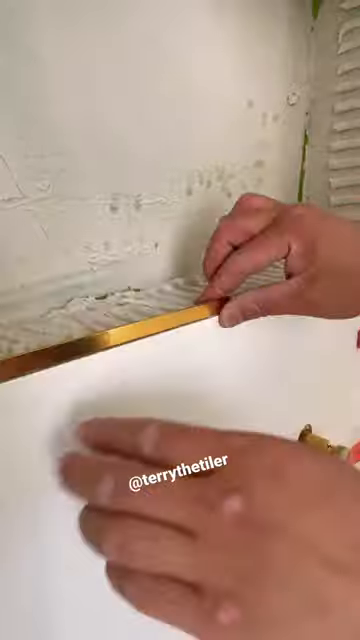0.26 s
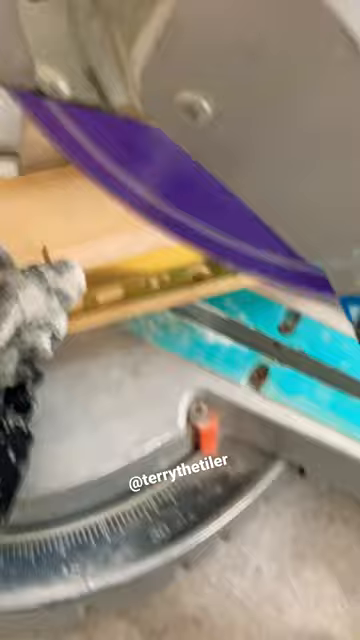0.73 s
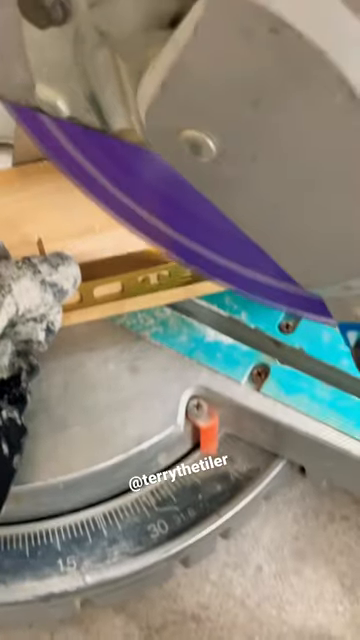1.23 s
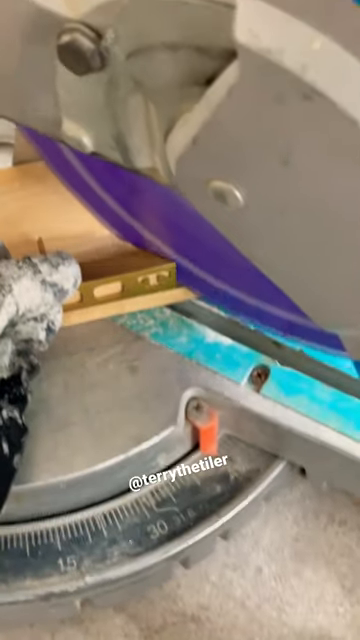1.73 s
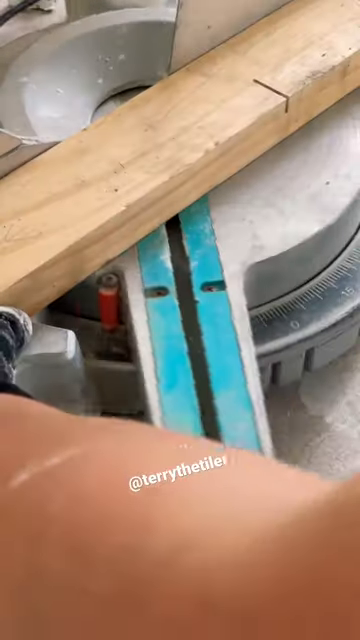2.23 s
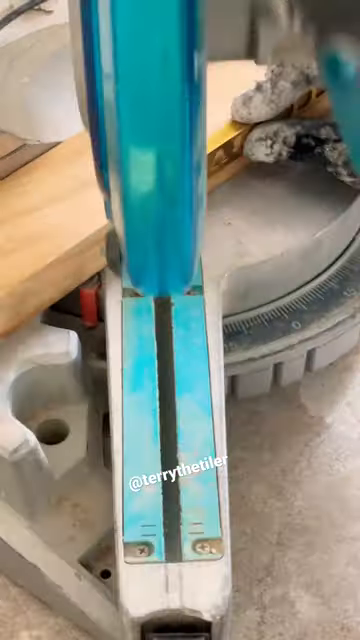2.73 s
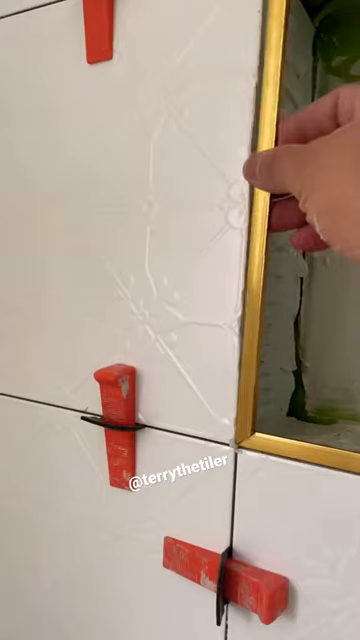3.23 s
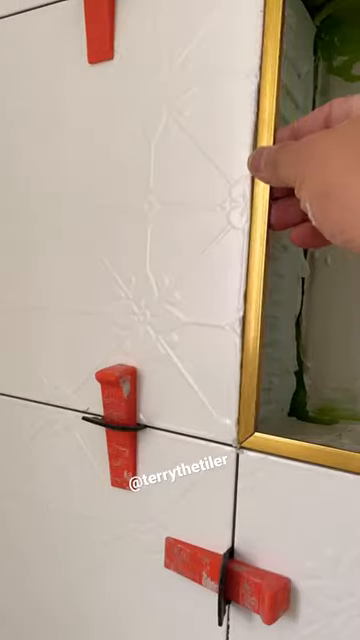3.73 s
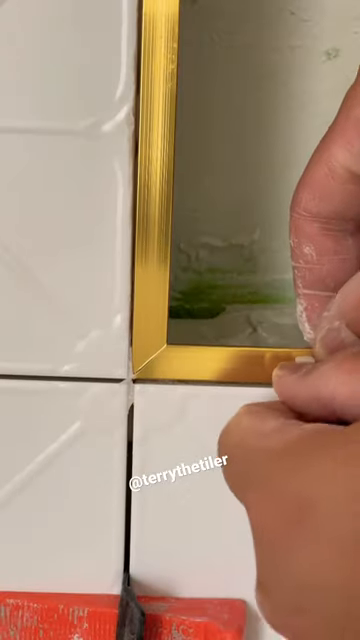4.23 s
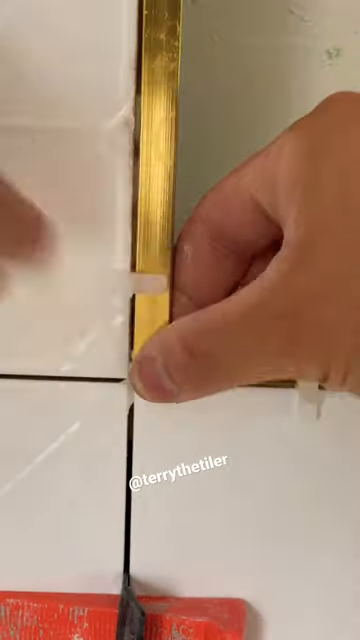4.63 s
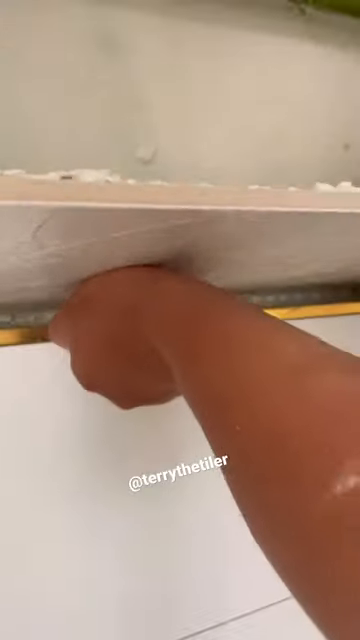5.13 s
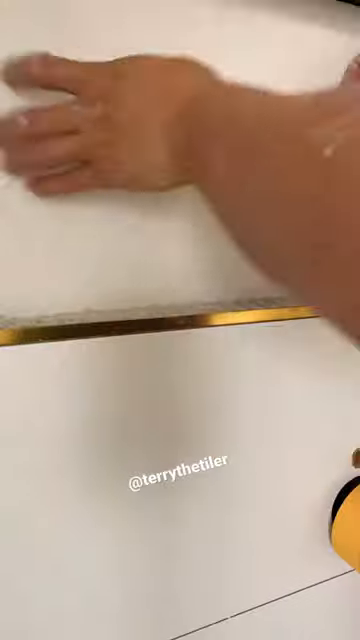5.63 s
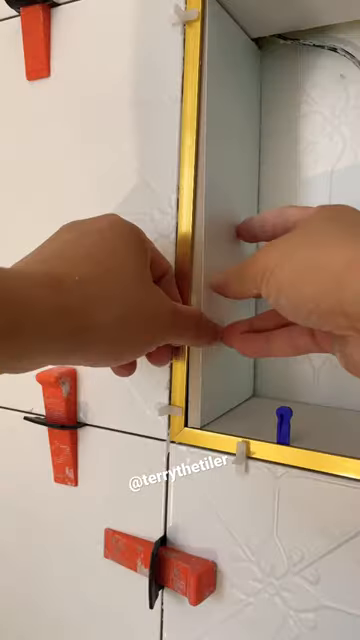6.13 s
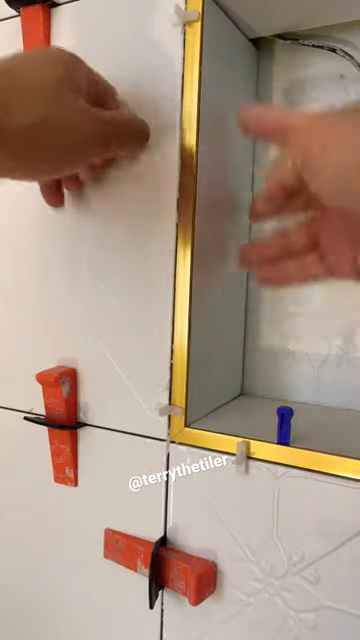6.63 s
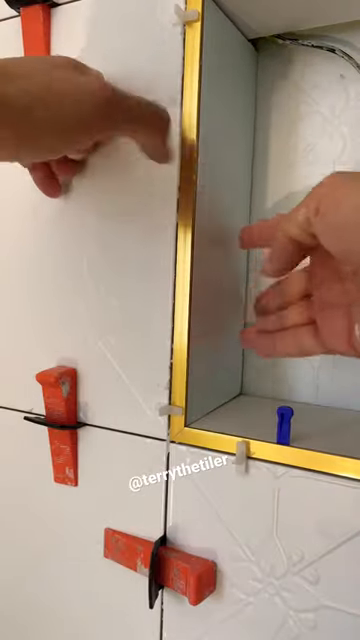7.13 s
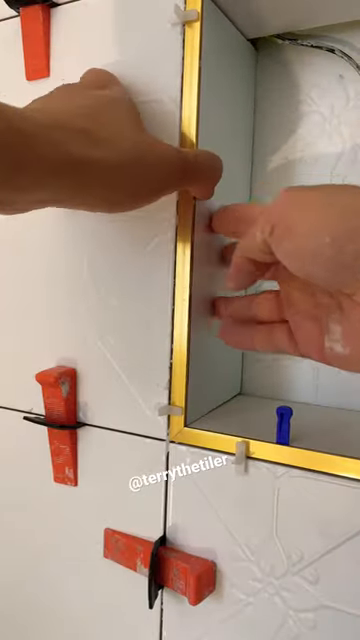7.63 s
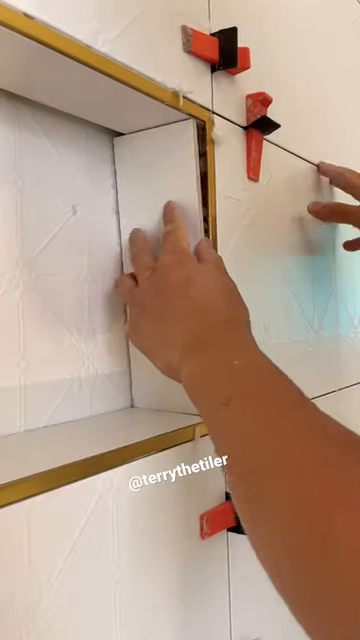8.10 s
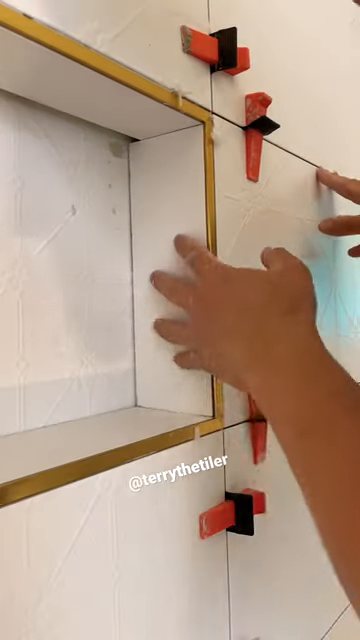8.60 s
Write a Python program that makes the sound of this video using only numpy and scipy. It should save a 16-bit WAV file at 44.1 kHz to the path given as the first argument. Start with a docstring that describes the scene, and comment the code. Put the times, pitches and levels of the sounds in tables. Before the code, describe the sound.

Hand pats and wipes a tile, a mitre saw knocks, whines and cuts twice, then tiles and trim rub, scrape, click and tap in a bathroom.

```python
"""Fitting metal tile trim, heard in stereo. First a hand pats and wipes a tile: filtered noise strokes and blows.
A mitre saw kicks in with gear knocks, cuts with blade noise and a shaft-locked whine; its table swings and
latches, and it runs again over a low electric hum and brakes. Then, in a small bathroom, trim and tiles are
rubbed, tapped, scraped and pressed home: noise grains, clicks and ringing modes. Faint air and hum lie under it
all, with a far drone of gliding tones in the bathroom part. The microphone loses the deepest bass."""
import sys
import numpy as np
from scipy import signal
from scipy.fft import rfft, irfft
from scipy.io import wavfile

SR = 44100
rng = np.random.default_rng(int(sys.argv[2]) if len(sys.argv) > 2 else 0)


def generate_wav(signal):
    """Clip the signal to [-1, 1] and save it as 16-bit WAV at the path in sys.argv[1]."""
    frames = np.transpose(np.atleast_2d(signal))
    scaled = np.clip(frames, -1, 1) * 32767
    pcm = np.round(scaled).astype(np.int16)
    wavfile.write(sys.argv[1], SR, pcm)


N = 390726

# Source levels are those before each layer's trim, its room and the microphone.
# The saw's two runs. Each row: time in seconds, rumble in dB, hiss in dB.
SAW_RUNS = [
    [(0.753, -22, -31), (0.789, -26.5, -29.5), (1.259, -31.5, -21), (1.285, -36.5, -23.5),
     (1.867, -44.5, -35.5), (1.879, -45.5, -30.5), (1.962, -50, -37.5)],
    [(2.482, -38, -25), (2.818, -44.5, -25.5), (2.934, -46.5, -33), (3.2, -54, -46), (3.225, -63, -47)],
]
# Blade noise of each run. Each row: frequency in Hz, density in dB per Hz.
SAW_COLOURS = [
    [(41, -49), (70, -39), (113, -13.5), (268, -4.5), (554, -3), (711, -6), (1540, -3), (3700, -8.5),
     (5890, -6), (7910, -12), (10900, -9), (11700, -15.5), (16000, -11)],
    [(41, -61), (70, -14), (152, -12), (199, 6.5), (262, -12), (394, -5), (606, -0.5), (1930, -2.5),
     (5250, -4), (16000, -12)],
]
# Blade and guard resonances in each run. Each row: frequency in Hz, width in Hz, level in dB.
BLADES = [
    [(575, 56, -0.5), (1210, 77, -12.5), (1520, 120, -10.5), (6770, 150, -6.5)],
    [(1190, 150, 3), (5280, 290, -4.5), (7040, 98, -24)],
]
# Teeth biting. Each row, one run: chips per second, size spread in dB, judder in dB, near-echo strength.
BITES = [(7190, 3.5, 1.16, 0.18), (3496, 5.5, 0.7, 0.21)]
# Low electric hum near 200 Hz, swelling in the second run and rising slightly. Each row: start in seconds,
# rise in seconds, fall in seconds, pitch in Hz, glide in Hz per second, level in dB.
ELECTRIC_HUM = [(2.57, 0.25, 0.06, 197.5, 22, -37)]
# Gear teeth knocking at the start. Each row: time in seconds, peak in dB.
KNOCKS = [(0.75, -8.5), (0.7786, -3), (0.788, -9), (0.819, -1.5), (0.858, -2.5), (0.9002, -3.5),
          (0.999, -10), (1.017, -15), (1.0386, -9.5)]
# Sound of a gear knock. Each row: frequency in Hz, level in dB.
KNOCK_COLOUR = [(60, -57), (130, -48), (230, -17.5), (550, -8), (850, -15), (1400, -6), (1750, 2.5),
                (2100, 4.5), (2400, -16.5), (3200, -9), (4200, -20.5), (15000, -26.5)]
BACKLASH_S, BACKLASH_DB = .0105, -6  # a lighter tap leads every knock but the first
# Shaft speed: closes in on the top after the switch, sags as the blade bites (BITE_S on the scene's clock).
TOP_HZ, SHORT_HZ, SPIN_UP_S, BITE_S, SAG_HZ_PER_S = 435, 320, .145, 1.58, 44
# The brake pulls the shaft down towards a coast.
BRAKE_AT_S, BRAKE_S, COAST_HZ, BRAKE_SWELL_S = 2.781, .178, 27, .09
# Motor tones: gears, whine, braking. Each row: multiple of the shaft speed, level in dB.
GEAR_ORDERS = [(8, -13), (12, -6), (16, -13), (20, -10), (24, -5.5), (26, -10)]
WHINE_ORDERS = [(28, -24)]
BRAKE_ORDERS = [(2, -25), (16, -39), (28, -33.5), (56, -41.5), (112, -48)]
# Shaft speeds between which gears and whine fade in.
GEARS_FROM_HZ, GEARS_FULL_HZ, WHINE_FROM_HZ, WHINE_FULL_HZ = 300, 370, 401, 407
GEAR_RATIO, BLADE_HUM_DB = 3.9, -49  # shaft turns per blade turn; hum once a blade turn
# The blade's whistle in the cut. The row: start, rise and fall in seconds, multiple of the shaft, level in dB.
WHISTLE = (1.22, .1, .26, 14, -27)
# How the motor housing radiates tones. Each row: frequency in Hz, level in dB.
HOUSING = [(500, -24), (2000, -14), (3100, -14), (3500, 0), (4000, 2), (4600, -4), (5500, -2), (6020, 0),
           (6500, -4), (8400, -5), (8900, 7), (9500, -4), (9900, -14), (11300, -3), (12050, 0),
           (12800, -18)]
# Pitches at which the braked motor is heard. Each row: frequency in Hz, level in dB.
BRAKE_COLOUR = [(2300, 3), (3100, -6), (3400, 0), (7400, 0), (9000, -13)]
# The saw table swinging on its bed. Each row: start, rise and fall in seconds, body in dB, hiss in dB.
SWING = [(1.962, 0.12, .22, -47.5, -54.5), (2.32, 0.13, 0.036, -56.5, -56)]
# Noise of the swing. Each row: frequency in Hz, density in dB per Hz.
SWING_COLOUR = [(60, -50), (160, -22), (256, 0), (822, -1), (1510, -8.5), (1700, -12.5), (16000, -43.5)]
# Saw table resonances. Each row: frequency in Hz, width in Hz, level in dB.
SWING_RING = [(662, 14, 4), (897, 20, 1), (1473, 19, 12)]
# Hard clacks of the saw's latch and of tiles meeting. Each row: time in seconds, peak in dB.
CLACKS = [(2.21, -26), (2.239, -23.5), (2.268, -13.5), (5.496, -28.5), (5.847, -19), (6.19, -34),
          (6.7, -34.5), (6.72, -34), (8.81, -47)]
# Sound of a clack. Each row: frequency in Hz, level in dB.
CLACK_COLOUR = [(70, -37), (300, 4.5), (650, -4.5), (1000, 6), (1350, 4.5), (1900, 1.5), (2400, -16.5),
                (16000, -40)]
# Soft rubbing of hands, trim and tile. Each row: start, rise and fall in seconds, body in dB, hiss in dB.
RUBS = [(0.068, 0.03, 0.19, -38.5, -50), (0.15, 0.095, 0.24, -41.5, -46.5), (0.37, 0.072, 0.15, -39, -54),
        (3.225, 0.19, 0.5, -70, -51.5), (3.52, 0.32, 0.031, -64, -49.5), (3.858, 0.016, 0.56, -46, -67.5),
        (3.93, 0.13, 0.32, -53.5, -45), (4.33, 0.1, 0.0081, -55, -44), (4.852, 0.011, 0.57, -68.5, -51.5),
        (5.11, 0.11, 0.86, -54.5, -49.5), (5.25, 0.25, 0.31, -47, -51), (6.38, 0.11, 0.13, -68, -62.5)]
# Noise of rubbing. Each row: frequency in Hz, density in dB per Hz.
RUB_COLOUR = [(35, -24.5), (65, -11.5), (130, -14), (301, 1.5), (380, -7.5), (579, -7.5), (946, -17),
              (7060, -17), (16000, -27)]
# Saw handle, trim and tiles dragged over their beds. Each row: start, rise and fall in seconds,
# body in dB, hiss in dB.
DRAGS = [(2.428, 0.017, 0.058, -31.5, -33.5), (5.355, 0.041, .05, -43.5, -43.5),
         (5.497, 0.14, 0.038, -39.5, -37), (5.722, 0.018, 0.083, -37, -33),
         (5.75, 0.012, 0.032, -32.5, -25), (5.795, 0.012, 0.011, -61, -27),
         (5.835, 0.057, 0.039, -34.5, -44.5), (5.92, 0.088, 0.13, -44.5, -64.5),
         (6.165, 0.019, .015, -57, -43.5), (6.186, 0.011, 0.035, -40.5, -40),
         (6.86, 0.12, 0.36, -47.5, -59.5), (7.275, 0.066, .07, -64, -46.5), (7.315, 0.04, 0.2, -48.5, -45),
         (7.57, .012, 0.03, -59, -53), (7.77, 0.0076, 0.2, -46, -40.5), (8.478, 0.058, 0.031, -51.5, -44),
         (8.71, 0.051, 0.099, -64, -47.5), (8.77, 0.028, 0.08, -40, -75)]
# Noise of dragging. Each row: frequency in Hz, density in dB per Hz.
DRAG_COLOUR = [(100, -27), (210, -17), (322, 1), (524, 0), (836, -11), (1280, -9), (1700, -15.5),
               (5080, -13), (16000, -21)]
# Resonances of a loose tile. Each row: frequency in Hz, width in Hz, level in dB.
TILE = [(214, 31, 20), (472, 13, 9), (860, 78, 5), (1153, 94, 0), (1930, 135, 6), (2625, 57, 0),
        (8300, 260, -15)]
# A large tile stuttering into place. The row: start, rise and fall in seconds, level in dB.
# Its negative fall ends the slide before the rise is complete.
SLIDE = (5.5, 0.1358, -0.05, -29)
# Noise of the slide. Each row: frequency in Hz, level in dB.
SLIDE_COLOUR = [(100, -13.5), (200, -6), (480, -1), (1200, -2), (1450, -7.5), (2600, -15.5), (16000, -20.5)]
# A tile edge grating along the trim. Each row: start, rise and fall in seconds, body in dB, hiss in dB.
GRATES = [(7.95, 0.014, 0.035, -45, -53), (8.064, 0.012, 0.065, -45.5, -44),
          (8.124, 0.015, 0.029, -49, -25.5), (8.176, 0.013, 0.028, -58, -25),
          (8.207, 0.022, 0.013, -51, -25.5)]
# Noise of grating. Each row: frequency in Hz, density in dB per Hz.
GRATE_COLOUR = [(200, -5), (1100, -15.5), (1740, -5), (2500, -13.5), (4400, -4.5), (5300, 5), (5900, -2),
                (12400, 0), (14200, 8), (16000, -2)]
# The grating edge catching and snapping free. Each row: time in seconds, peak in dB.
CATCHES = [(8.096, -33), (8.1985, -18), (8.2135, -18), (8.236, -21)]
# The edge squeaking upwards. Each row: start, rise and fall in seconds, pitch in Hz,
# glide in Hz per second, level in dB.
SQUEAKS = [(8.017, .008, .028, 1650, 5000, -51), (8.122, .022, .014, 1600, 7000, -44),
           (8.205, .025, .015, 1750, 14000, -48)]
# Sharp clicks of grit, trim and tile edges. Each row: time in seconds, peak in dB.
CLICKS = [(2.3056, -29.5), (2.484, -13), (4.5663, -37), (4.7372, -48.5), (5.39, -22), (5.8471, -17),
          (6.121, -41), (6.16, -36), (6.19, -22.5), (6.4622, -32), (6.4882, -30), (6.7188, -20),
          (6.76, -26), (6.7654, -19.5), (6.9954, -24.5), (7.3901, -30), (7.5665, -16), (7.5685, -19.5),
          (7.5845, -28), (8.4412, -28.5), (8.508, -21.5), (8.519, -32), (8.7435, -27)]
# Sound of a click. Each row: frequency in Hz, level in dB.
CLICK_COLOUR = [(60, -38), (200, 15), (750, 6.5), (1600, -7.5), (3000, 1.5), (5500, 2), (8000, 4),
                (9500, -3.5), (12000, 6), (16000, -1)]
# A flat hand patting the tile. Each row: time in seconds, peak in dB.
PATS = [(.072, -33.5), (.17, -28), (.192, -30.5), (.407, -29.5), (.657, -35), (3.858, -37)]
# Dull pushes and bumps. Each row: time in seconds, peak in dB, the wall's boom over it in dB.
THUDS = [(0.661, -29, -7), (1.874, -25, -11), (3.085, -22.5, -13), (4.499, -54, 7), (4.569, -57.5, 7.5),
         (4.638, -65.5, 16.5), (4.744, -61, 7.5), (5.755, -28, -12), (5.853, -28, 2.5), (6.194, -26.5, -2),
         (6.717, -29, -3.5), (7.525, -44, 3), (7.615, -47.5, 6.5), (7.768, -23.5, -24), (8.176, -34, -5.5),
         (8.813, -44, 0)]
# Sound of a push or pat. Each row: frequency in Hz, level in dB.
THUD_COLOUR = [(40, -15), (120, -1), (200, -1.5), (310, 2.5), (500, -6), (700, -13), (4000, -25),
               (16000, -48.5)]
# Modes of the pushed tiled wall. Each row: frequency in Hz, level in dB, T60 in seconds.
WALL = [(143.5, 7.5, 0.22), (132, -6, 0.21), (404, -6, 0.2)]
# A tile knocking home in the side of the niche. Each row: time in seconds, level in dB.
SEATINGS = [(7.769, -32.5), (7.795, -33)]
# Modes of the hollow niche. Each row: frequency in Hz, level in dB, T60 in seconds.
NICHE = [(369, 0, .36), (409, -4, .2), (490, -4, .3), (555, -10, .27)]
# Fingertips tapping the tile lining the niche. Each row: time in seconds, peak in dB.
TAPS = [(6.868, -42), (6.957, -47), (6.997, -45), (7.058, -39), (7.125, -45.5), (7.569, -42), (7.587, -42),
        (8.106, -38), (8.444, -44), (8.487, -46), (8.81, -39)]
# Modes of that tile. Each row: frequency in Hz, mean level in dB, T60 in seconds.
TAP_MODES = [(402, -1.5, 0.14), (476, 0.5, 0.11), (564, -1, 0.093), (637, -8.5, 0.079), (780, -21, 0.071),
             (984, -2, 0.046)]
# The far motor's drone. Each row: start, rise and fall in seconds, pitch in Hz,
# glide in Hz per second, level in dB.
DRONES = [(4.85, 0.21, 0.18, 99.3, -5.5, -30.5), (5.15, 0.094, 0.31, 97.8, -4, -41.5),
          (5.88, 0.3, 0.79, 145, -12.5, -42.5), (6.6, 1, 0.13, 137.7, -2, -46.5),
          (7.85, 0.097, 1.26, 158.1, 6, -44.5)]
# Tones of the drone. Each row: harmonic number, level in dB.
DRONE_TONES = [(1, -2), (2, -16.5), (3, -19.5)]
DRONE_START_DB, DRONE_END_DB = -8, -13
HUM_HZ, HUM_DB = 572, -67
# Room air. Each row: frequency in Hz, density in dB per Hz; then its overall level.
AIR = [(25, -19), (86, -4), (145, 4.5), (204, -5.5), (550, -13.5), (1500, -16), (1900, -22), (4000, -31),
       (16000, -36)]
AIR_DB = -56.5
# Decay of the room. Each row: frequency in Hz, T60 in seconds.
ROOM = [(150, 0.072), (500, 0.4), (2000, 0.25), (8000, 0.14), (16000, 0.24)]
# Stereo width at the saw, then in the bathroom. Each row: frequency in Hz, side over mid in dB.
SAW_WIDTH = [(130, -21), (290, -7), (640, -15), (1900, -14.5), (3500, -59), (6820, -28), (14000, -0.5)]
ROOM_WIDTH = [(130, -43.5), (640, -16.5), (1410, -3), (3100, -11.5), (6820, -3)]
# Bands called body, middle and hiss. Each row: lower edge in Hz, upper edge in Hz.
BAND_EDGES = [(60, 700), (700, 3000), (3000, 16000)]
EDGE_HZ = 16000  # top of the recorder's band
COMB = .17  # strength of near echoes at hand work and table


def saw():
    """Teeth and air rush through the blade's resonances; tones follow the shaft; gears knock; a low hum swells."""
    out = motor()
    for rows, spectrum, modes, bite in zip(SAW_RUNS, SAW_COLOURS, BLADES, BITES):
        chips_per_s, chip_db, judder_db, comb = bite
        t, rumble_db, hiss_db = follow(rows)
        out += strokes([(t[0], rumble_db, hiss_db)], spectrum, db=-2.5, comb=comb,
                       grains_per_s=chips_per_s, grain_db=chip_db, smooth=0.97,
                       judder_db=judder_db, judder_hz=106.5, middle_db=1.0, modes=modes)
    out += hums(ELECTRIC_HUM, [(1, 4), (3, 2.5)], start_db=-12, end_db=-12,
                jitter=0.0034, jitter_hz=32.4, flicker_db=1.5)
    return out + gear_knocks()


def gear_knocks():
    """Gear teeth strike at the start, a lighter backlash tap leading each later knock."""
    lighter = [(s - BACKLASH_S, db + BACKLASH_DB) for s, db in KNOCKS[1:]]
    return hits(KNOCKS + lighter, KNOCK_COLOUR, db=-0.5, t60=.016, rattle=.14, tail_db=-14, tail_t60=.07)


def motor():
    """The whine climbs with the shaft and sags in the cut; in the second run it falls under the brake."""
    out = np.zeros(N)
    t, _, hiss_db = follow(SAW_RUNS[0])
    spin_up = TOP_HZ - SHORT_HZ * np.exp((t[0] - t) / SPIN_UP_S)
    speed = spin_up - SAG_HZ_PER_S * np.maximum(t - BITE_S, 0)
    # the gears ride on the hiss
    gears = amp(hiss_db) * np.interp(speed, [GEARS_FROM_HZ, GEARS_FULL_HZ], [0, 1])
    add(out, t[0], gears * whine(speed, GEAR_ORDERS, blur=1.1, blur_hz=250))
    singing = np.interp(speed, [WHINE_FROM_HZ, WHINE_FULL_HZ], [0, 1])
    singing = singing * np.minimum((t[-1] - t) / 0.073, 1) ** 2
    flicker = amp(2 * wander(len(t), 8))
    add(out, t[0], singing * flicker * whine(speed, WHINE_ORDERS, blur=.45, throb=.45))
    blade_hum = tones(speed / GEAR_RATIO, [(1, BLADE_HUM_DB)], jitter=.02, jitter_hz=30, flicker_db=3)
    add(out, t[0], singing * blade_hum)
    whistle(out, t, speed)
    brake(out)
    return out


def whistle(out, t, speed):
    """The blade whistles in the cut at a fixed multiple of the shaft speed."""
    s, rise, fall, order, db = WHISTLE
    gain = amp(swell(rise, fall, -14, -14, 2))
    cut_speed = np.interp(s + np.arange(len(gain)) / SR, t, speed)
    add(out, s, gain * whine(cut_speed, [(order, db)], blur=.3))


def brake(out):
    """The braked shaft slows exponentially and its tones fall with it."""
    t = np.arange(0, SAW_RUNS[1][-1][0] - BRAKE_AT_S, 1 / SR)
    speed = COAST_HZ + (TOP_HZ - COAST_HZ) * np.exp(-t / BRAKE_S)
    falling = colour(whine(speed, BRAKE_ORDERS, blur=.52, blur_hz=300, throb=.2), BRAKE_COLOUR)
    add(out, BRAKE_AT_S, np.minimum(t / BRAKE_SWELL_S, 1) * falling)


def whine(speed, orders, blur=.6, blur_hz=130, throb=0.74):
    """Shaft orders through the housing, their phase blurred, throbbing once a blade turn."""
    count = len(speed)
    phase = 2 * np.pi * np.cumsum(speed) / SR
    out = np.zeros(count)
    for k, db in orders:
        hz = k * speed
        gain = amp(db + read(HOUSING, hz)) * (hz < EDGE_HZ)
        out += gain * np.sin(k * phase + blur * wander(count, blur_hz))
    return out * (1 + throb * np.sin(phase / GEAR_RATIO))


def table_swing():
    """The saw table grinds round on its bed and rings with it."""
    return strokes(gestures(SWING, start_db=-2.0, end_db=-5.0, bend=0.61), SWING_COLOUR, db=0.0,
                   grains_per_s=5600, grain_db=3.5, smooth=0.82,
                   judder_db=0.5, judder_hz=81.5, middle_db=-1.5, modes=SWING_RING)


def clacks():
    """Hard parts meet: a short, bright blow."""
    return hits(CLACKS, CLACK_COLOUR, db=2.5, t60=0.062, rattle=0.13, tail_db=-26.5, tail_t60=0.07)


def rubs():
    """Soft rubbing: many fine slips under a strong smooth rush."""
    return strokes(gestures(RUBS, start_db=-9.5, end_db=-25.5, bend=1.04), RUB_COLOUR, db=-0.5,
                   grains_per_s=15000, grain_db=2.0, smooth=1.5,
                   judder_db=0.9, judder_hz=36.8, middle_db=5)


def drags():
    """Dragging: sparse uneven slips drive the loose tile's resonances."""
    return strokes(gestures(DRAGS, start_db=-3.5, end_db=-22.5, bend=0.72), DRAG_COLOUR, db=-3.5,
                   grains_per_s=1500, grain_db=5.0, smooth=1.0,
                   judder_db=2.5, judder_hz=74.0, middle_db=6.5, modes=TILE)


def grates():
    """The edge grates in coarse juddering slips, squeaks upwards, and snaps free in short blows."""
    out = strokes(gestures(GRATES, start_db=-0.5, end_db=-28, bend=2.5), GRATE_COLOUR, db=-7.0,
                  grains_per_s=5800, grain_db=5.0, smooth=0.41,
                  judder_db=3.5, judder_hz=174, middle_db=7.5)
    out += hums(SQUEAKS, [(1, 0), (3, -9)], start_db=-9, end_db=-12,
                jitter=.085, jitter_hz=700, flicker_db=4)
    return out + hits(CATCHES, GRATE_COLOUR, db=-4, t60=0.0081, rattle=0.54, tail_db=-18, tail_t60=.04)


def slide(slips_per_s=105, uneven=.3, slip_s=.0018, size_db=1.8):
    """The tile sticks and slips at an uneven rate; every slip is a short scratch that rings it."""
    s, rise, fall, db = SLIDE
    gain = amp(swell(rise, fall, start_db=-2.0, end_db=-27, bend=1.0))
    turns = np.cumsum(slips_per_s * np.exp(uneven * wander(len(gain), 60))) / SR
    sizes = amp(size_db * rng.standard_normal(200))
    scratch = np.exp(-(turns % 1) / (slips_per_s * slip_s)) * sizes[turns.astype(int)]
    drive = gain * (scratch + 0.14) * rng.standard_normal(len(gain))
    drive = np.pad(drive, (0, SR // 10))  # time to ring on
    out = np.zeros(N)
    add(out, s, amp(db - 4.5) * evened(colour(resonant(drive, TILE), SLIDE_COLOUR)))
    return out


def clicks():
    """Grit and edges click: short bright blows."""
    return hits(CLICKS, CLICK_COLOUR, db=-1.0, t60=0.019, rattle=0.31, tail_db=-13.5, tail_t60=0.089)


def pats():
    """A flat hand lands on the tile: dull blows."""
    return hits(PATS, THUD_COLOUR, db=-0.5, t60=0.12, rattle=0.32, tail_db=-16.0, tail_t60=0.38)


def thuds():
    """A soft push gives a dull knock with the wall's modes behind it; a seating tile rings the niche."""
    out = np.zeros(N)
    for s, peak_db, boom_db in THUDS:
        add(out, s, amp(peak_db) * blow(THUD_COLOUR, t60=0.22, rattle=0.4, tail_db=-24.5, tail_t60=0.48))
        add(out, s, amp(peak_db + boom_db) * ring(WALL, swell_s=0.014))
    for s, level_db in SEATINGS:
        add(out, s, amp(level_db) * ring(NICHE, swell_s=0.0026))
    return out


def taps(place_db=4):
    """Each fingertip lands on another spot, so the tile's modes mix differently."""
    out = np.zeros(N)
    for s, peak_db in TAPS:
        modes = [(hz, db + place_db * rng.standard_normal(), t60) for hz, db, t60 in TAP_MODES]
        sound = ring(modes, swell_s=.001)
        add(out, s, amp(peak_db) * sound / abs(sound).max())
    return out


def background():
    """Room air as coloured noise, a faint wavering hum and the far motor's gliding tones."""
    out = amp(AIR_DB) * evened(colour(rng.standard_normal(N), AIR))
    out += amp(HUM_DB) * tones(np.full(N, HUM_HZ), [(1, 0.0086)], jitter=0.0023, jitter_hz=4.8,
                               flicker_db=-3.5)
    return out + hums(DRONES, DRONE_TONES, start_db=DRONE_START_DB, end_db=DRONE_END_DB,
                      jitter=0.01, jitter_hz=7.77, flicker_db=2)


def friction(body_db, hiss_db, spectrum, grains_per_s, grain_db, smooth, judder_db, judder_hz, middle_db,
             modes=()):
    """Tiny slips over a smooth rush; the contact judders; the middle follows between body and hiss."""
    count = len(body_db)
    slips = (rng.random(count) < grains_per_s / SR) * rng.choice([-1, 1], count)
    slips = slips * amp(grain_db * np.minimum(rng.exponential(1, count), 4))
    judder = amp(judder_db * wander(count, judder_hz))
    drive = (evened(slips) + smooth * rng.standard_normal(count)) * judder
    sound = np.pad(colour(resonant(drive, modes), spectrum), 1)
    bands = []
    for edges in BAND_EDGES:
        band_pass = signal.butter(3, edges, "band", fs=SR, output="sos")
        bands.append(signal.sosfiltfilt(band_pass, sound, padtype=None)[1:-1])
    body, middle, hiss = bands
    body_gain, hiss_gain = amp(body_db) / body.std(), amp(hiss_db) / hiss.std()
    middle_gain = amp(middle_db) * np.sqrt(body_gain * hiss_gain)
    sound = body_gain * body + middle_gain * middle + hiss_gain * hiss
    return sound * signal.windows.tukey(count, min(300 / count, 1))


def strokes(levels, spectrum, db, comb=COMB, **grain):
    """A set of strokes over one kind of surface, each from its own place."""
    out = np.zeros(N)
    for s, body_db, hiss_db in levels:
        add(out, s, reflected(friction(body_db, hiss_db, spectrum, **grain), comb))
    return amp(db) * out


def swell(rise_s, fall_s, start_db, end_db, bend):
    """Level in dB of one gesture: from start_db to 0 during the rise, then down to end_db."""
    t = np.arange(0, rise_s + fall_s, 1 / SR)
    rising = start_db * abs(1 - t / rise_s) ** bend
    falling = end_db * abs((t - rise_s) / fall_s) ** bend
    return np.where(t < rise_s, rising, falling)


def gestures(rows, **shape):
    """Start, body level and hiss level of each stroke of a table."""
    levels = []
    for s, rise, fall, body_db, hiss_db in rows:
        arch = swell(rise, fall, **shape)
        levels.append((s, body_db + arch, hiss_db + arch))
    return levels


def hums(rows, partials, start_db, end_db, **waver):
    """Gliding tones that swell and fade."""
    out = np.zeros(N)
    for s, rise, fall, hz, glide, db in rows:
        gain = amp(db + swell(rise, fall, start_db, end_db, 1.53))
        pitch = hz + glide * np.arange(len(gain)) / SR
        add(out, s, gain * tones(pitch, partials, **waver) * signal.windows.tukey(len(gain), .05))
    return out


def tones(hz, partials, jitter, jitter_hz, flicker_db):
    """Partials of a slightly unsteady pitch, each wavering on its own."""
    count = len(hz)
    phase = 2 * np.pi * np.cumsum(hz * (1 + jitter * wander(count, jitter_hz))) / SR
    return sum(amp(db + flicker_db * wander(count, jitter_hz)) * np.sin(k * phase) for k, db in partials)


def blow(spectrum, t60, rattle, tail_db, tail_t60):
    """One blow of peak 1: an impulse, a burst of dense ringing and a weaker tail."""
    t = np.arange(SR // 4) / SR
    decay = amp(-60 * t / t60) + amp(tail_db - 60 * t / tail_t60)
    burst = rattle * rng.standard_normal(len(t)) * decay
    burst[0] += 1
    sound = colour(burst, spectrum)
    return sound / abs(sound).max()


def hits(rows, spectrum, db, **shape):
    """Every blow of one table."""
    out = np.zeros(N)
    for s, peak_db in rows:
        add(out, s, amp(peak_db + db) * blow(spectrum, **shape))
    return out


def ring(modes, swell_s):
    """Modes, each up to 2 % sharp at random, that build up briefly and die away."""
    t = np.arange(SR // 2) / SR
    sound = np.zeros(len(t))
    for hz, db, t60 in modes:
        sound += amp(db - 60 * t / t60) * np.sin(2 * np.pi * hz * rng.uniform(1.0, 1.02) * t)
    return (1 - np.exp(-t / swell_s)) * sound


def resonant(x, modes):
    """Adds a body's resonances to whatever drives it."""
    return x + sum(amp(db) * signal.lfilter(*signal.iirpeak(hz, hz / width, SR), x)
                   for hz, width, db in modes)


def reflected(x, strength, reach=.004, count=6):
    """Near faces return the sound within a few milliseconds and comb it into narrow bands."""
    taps = np.zeros(round(SR * reach) + 12)
    places = 12 + (rng.random(count) * (len(taps) - 12)).astype(int)
    taps[places] = strength * rng.choice([-1, 1], count)
    taps[0] = 1
    return signal.fftconvolve(x, taps / np.linalg.norm(taps))[:len(x)]


def amp(db):
    """Decibels to gain."""
    return 10 ** (np.asarray(db) / 20)


def evened(x):
    """Scales to rms 1."""
    return x / np.sqrt(np.mean(x ** 2) + 1e-20)


def read(points, hz):
    """Reads a spectrum on a log-frequency axis."""
    f, value = np.transpose(points)
    return np.interp(np.log(hz + 1), np.log(f + 1), value)


def follow(rows):
    """Time axis and one straight-segment curve for each column."""
    s, *columns = np.transpose(rows)
    t = np.arange(s[0], s[-1], 1 / SR)
    return [t] + [np.interp(t, s, c) for c in columns]


def add(mix, s, sound):
    """Mixes a sound in at time s."""
    part = mix[max(round(s * SR), 0):][:len(sound)]
    part += sound[:len(part)]


def colour(x, points, size=4096):
    """Causal (minimum-phase) filter with the given spectrum."""
    log_gain = np.log(amp(read(points, abs(np.fft.fftfreq(size, 1 / SR)))))
    taps = np.fft.ifft(np.exp(np.conj(signal.hilbert(log_gain)))).real[:size // 2]
    return signal.fftconvolve(x, taps)[:len(x)]


def wander(count, hz):
    """Slow random curve: normal draws, two per cycle of hz, joined by straight lines."""
    knots = np.arange(count) * hz * 2 / SR
    return np.interp(knots, np.arange(N // 20), rng.standard_normal(N // 20))


def room(x):
    """A dense tail whose bands die at their own speed."""
    hz, t, z = signal.stft(rng.standard_normal(SR // 2), SR, nperseg=256)
    decay = amp(-60 * t / read(ROOM, hz)[:, None]) * (t > .003)
    tail = signal.istft(z * decay, SR, nperseg=256)[1]
    return signal.fftconvolve(x, tail / np.linalg.norm(tail))[:N]


def spread(x, width, diffuse):
    """Two microphone ports hear the sound a little out of phase, and one shared set of reflections reaches them
    with opposite sign."""
    t = np.arange(SR // 10) / SR
    echoes = rng.standard_normal(len(t)) * amp(-60 * t / 0.13) * (t > .004)
    late = signal.fftconvolve(x, echoes / np.linalg.norm(echoes))[:N]
    apart = np.sqrt(1 - diffuse) * 1j * rfft(x) + np.sqrt(diffuse) * rfft(late)
    side = irfft(apart * amp(read(width, np.fft.rfftfreq(N, 1 / SR))), N)
    return np.array([x + side, x - side])


def scene():
    """The saw and its table, hand work with the ring of the bathroom, and the background."""
    machine = saw() + table_swing()
    machine += amp(-9.5) * room(machine)
    hands = rubs() + drags() + grates() + slide() + clicks() + pats() + thuds() + taps()
    hands += amp(-9.0) * room(hands)
    hands += clacks() + background()  # these get no room tail
    return spread(machine, SAW_WIDTH, diffuse=.4) + spread(hands, ROOM_WIDTH, diffuse=0.26)


def record(dry):
    """The microphone's bass roll-off and the recorder's band limit."""
    thin = signal.sosfilt(signal.butter(2, 50, "high", fs=SR, output="sos"), dry)
    low_pass = signal.firwin(401, EDGE_HZ, window=("kaiser", 8), fs=SR)
    return signal.oaconvolve(thin, low_pass[None], "same")


dry = scene()
out = record(dry)
generate_wav(out)
```